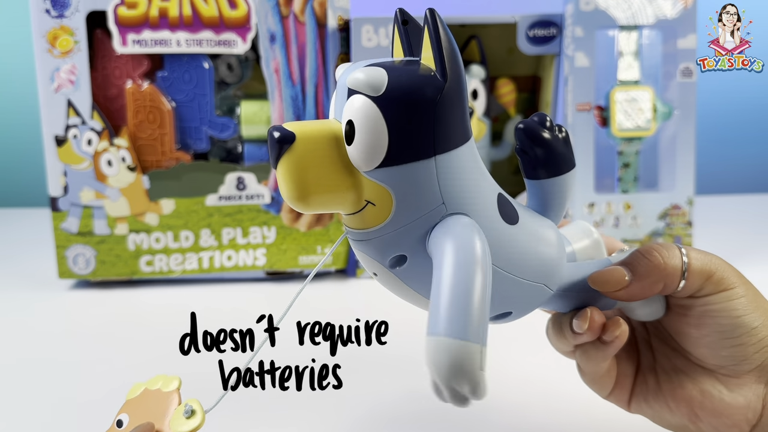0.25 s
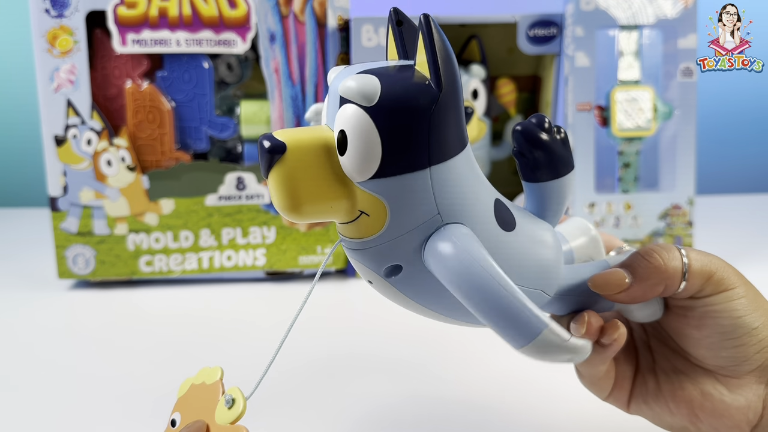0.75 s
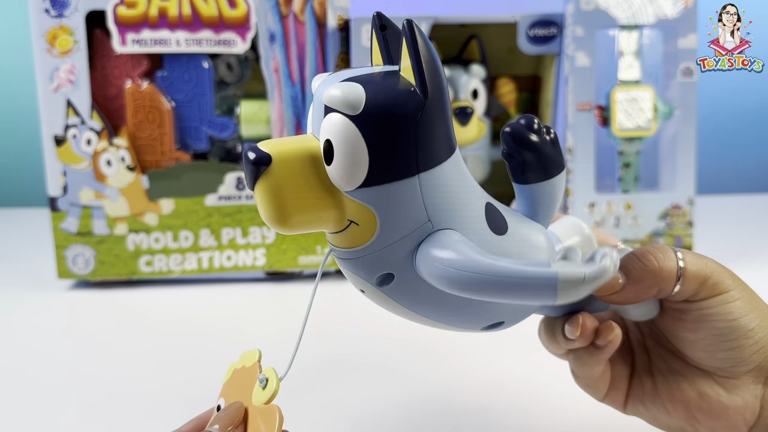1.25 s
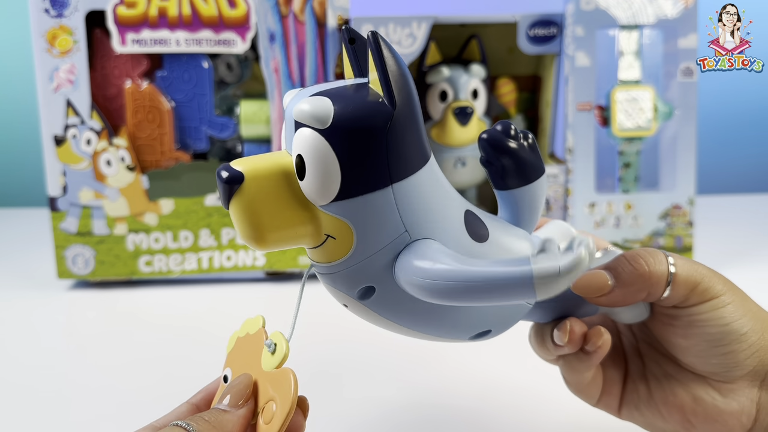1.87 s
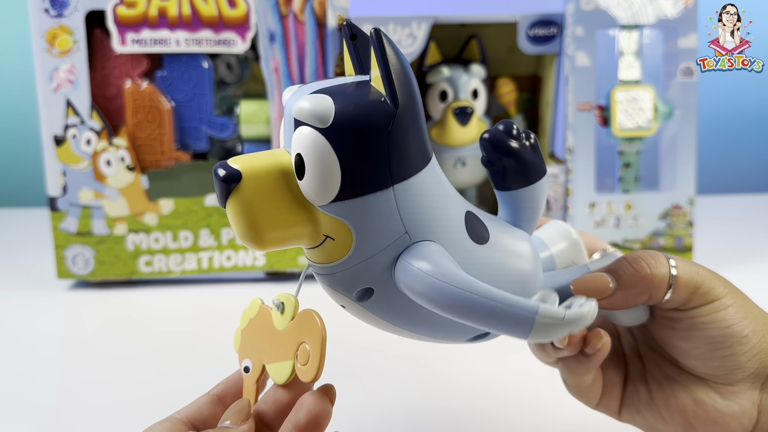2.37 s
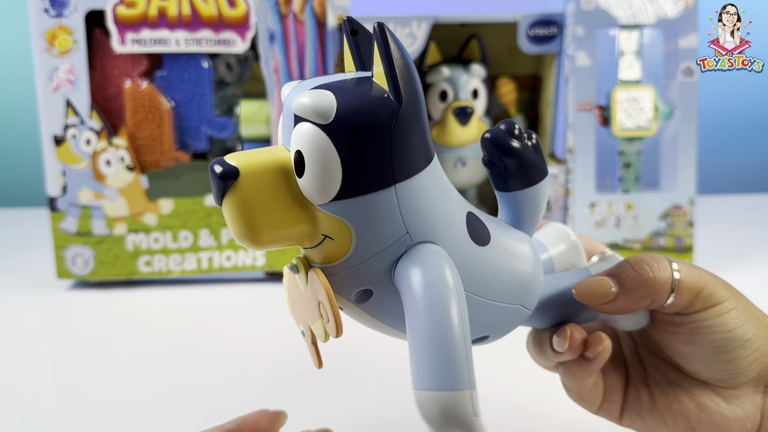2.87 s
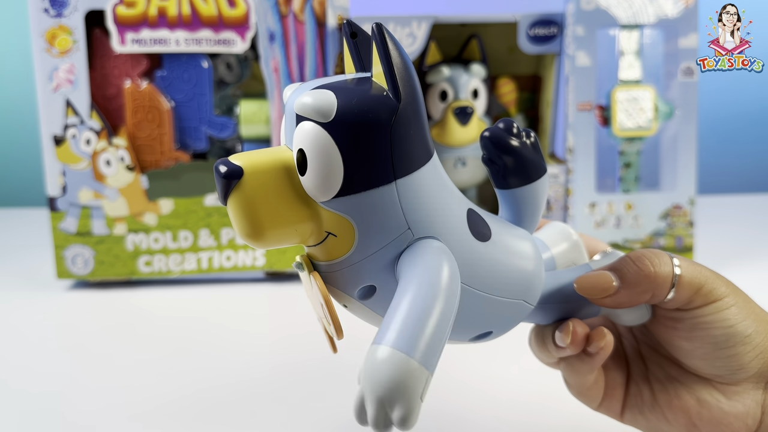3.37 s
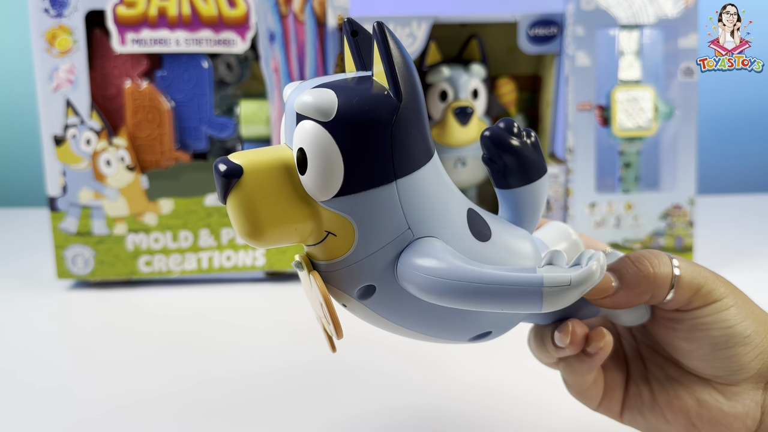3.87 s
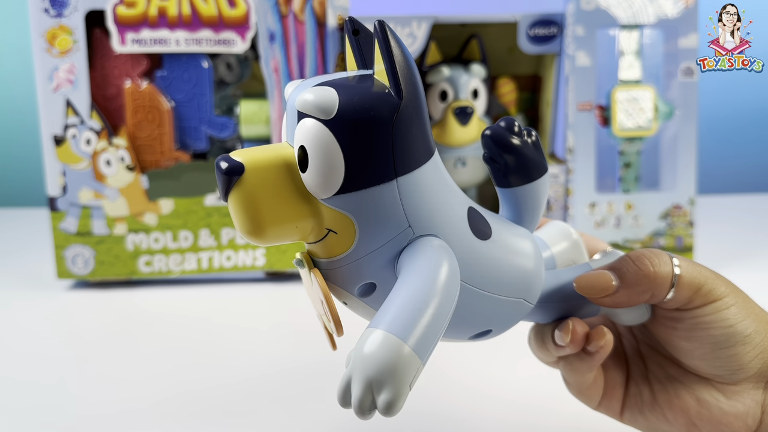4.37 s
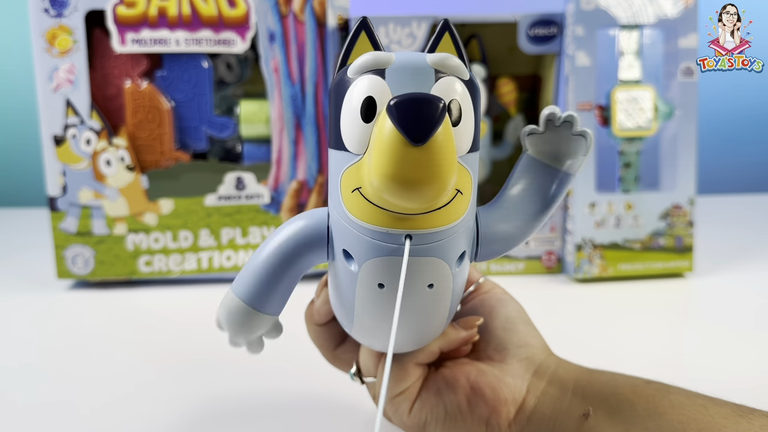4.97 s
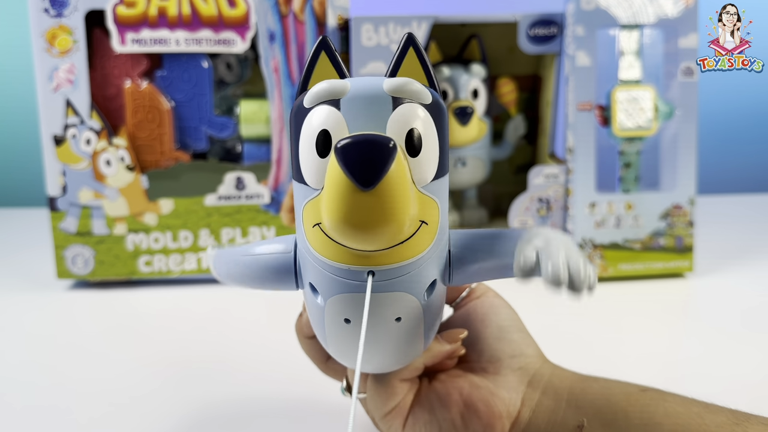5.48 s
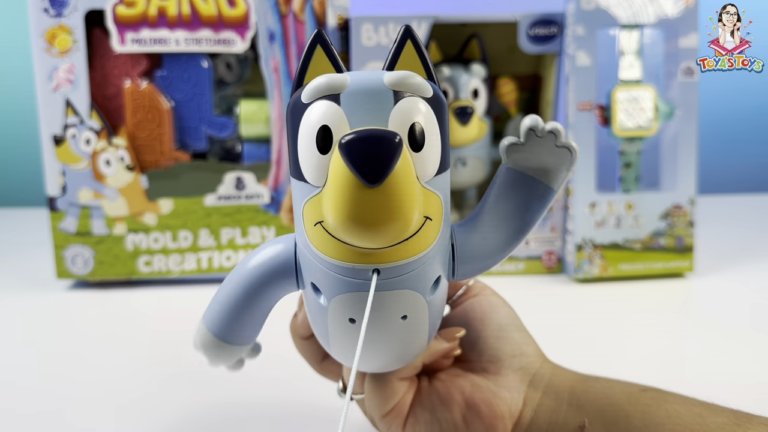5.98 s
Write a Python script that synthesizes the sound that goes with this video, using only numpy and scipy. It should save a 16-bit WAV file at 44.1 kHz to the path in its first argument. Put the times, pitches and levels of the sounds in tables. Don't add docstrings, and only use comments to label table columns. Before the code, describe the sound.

Steady, uneven plastic clacking and gear whir from a wind-up toy with swinging arms, heard close and dry with a short room echo. The knocking gradually slows, the whir drops away and a few sharp clicks mark the spring giving out. A second of soft room hush follows, with barely any touches. Then the mechanism spins up quickly into a denser, stronger rattle of about twelve hard knocks a second.

```python
import sys
import numpy as np
from scipy import signal
from scipy.fft import rfft, irfft, next_fast_len
from scipy.io import wavfile

SR = 44100
rng = np.random.default_rng(int(sys.argv[2]) if len(sys.argv) > 2 else 0)


def volts_from_db(level):
    exponent = np.asarray(level, float) / 20
    return 10 ** exponent


def int16_out(signal):
    q = np.round(np.clip(np.atleast_2d(signal).T, -1, 1) * 32767)
    wavfile.write(sys.argv[1], SR, q.astype(np.int16))


N = 274743

# (time of hard contact [s], its peak [dB], extra for the soft contact [dB])
TURNS_SIDEWAYS = [(0.021, -27.5, 0.1), (0.139, -26, 1), (0.254, -23.5, -1), (0.373, -23.5, -0.5),
                  (0.492, -22, 1.2), (0.611, -22, -0.5), (0.731, -24.5, 0.5), (0.852, -22.5, -1.5),
                  (0.974, -23.5, 0.1), (1.096, -27, 3.3), (1.214, -22.5, -2.5), (1.336, -26.5, 3.5),
                  (1.456, -24, 3), (1.578, -23.5, 2), (1.7, -22, 1.5), (1.824, -22.5, -0.5), (1.95, -24, 1),
                  (2.078, -23.5, 0.5), (2.206, -24, 2), (2.333, -22, 1.5), (2.463, -21.5, -3),
                  (2.593, -23, -0.7), (2.728, -26, -0.7), (2.862, -23.5, -3.2), (2.999, -25.5, -1.2),
                  (3.145, -23, -4.2)]
# (time of hard contact [s], peak [dB], extra for the soft contact
# [dB])
TURNS_FACING = [(4.922, -22.5, 0.1), (5.015, -21, 0.1), (5.099, -19, 0.1), (5.182, -20, 0.1),
                (5.263, -18.5, 0.1), (5.346, -19, 0.1), (5.43, -20, 0.1), (5.511, -19, 0.1),
                (5.596, -19, 0.1), (5.682, -19, 0.1), (5.767, -19, 0.1), (5.855, -20.5, 0.1),
                (5.941, -17.5, 0.1), (6.029, -20.5, 0.1), (6.116, -18, 0.1), (6.206, -18.5, 0.1)]
# (place [turns], knock [dB], hollow thud [dB], bright rattle [dB])
LOBES_SIDEWAYS = [
    (-.29, -34, -43.5, -38.5),
    (0, -26.5, -36.5, -30.5),
    (.345, -63, -46.5, -70),
]
# (place [turns], knock [dB], hollow thud [dB], bright rattle [dB])
LOBES_FACING = [
    (-.31, -29, -37, -33),
    (0, -24, -30.5, -30),
    (.35, -58, -64, -58),
]
# (knock [dB], thud [dB], rattle [dB])
SLOWING = [
    (-1.5, 2.6, -2),
    (-0.46, -1.3, -1.5),
    (-3.5, -1.4, 3.5),
]
# (time [s], knock [dB], thud [dB], rattle [dB])
CAM_STALLING = [
    (3.346, -28.5, -43.5, -46),
    (3.631, -32, -45, -63),
    (3.702, -55, -58, -73),
    (3.931, -81, -69, -84),
    (3.994, -61.5, -63.5, -79),
    (4.469, -63, -84.5, -69),
]
# (time [s], knock [dB], thud [dB], rattle [dB])
CAM_RELEASE = [
    (4.598, -72.5, -81, -60),
    (4.639, -54, -67, -68),
    (4.686, -67, -84, -60),
    (4.731, -81, -74, -56),
    (4.765, -36, -52, -43),
    (4.807, -27, -35.5, -44),
]
# (time [s], level [dB])
GEARS_SIDEWAYS = [
    (0.0, -47),
    (0.56, -48),
    (1.81, -48),
    (3.04, -46.5),
    (3.26, -53.5),
    (3.37, -54),
    (3.68, -62.5),
    (4.02, -76),
    (4.2, -75.5),
]
# (time [s], level [dB])
GEARS_FACING = [
    (4.56, -91),
    (4.684, -63),
    (4.87, -47),
    (4.95, -43.5),
    (5.29, -42.5),
    (6.23, -45),
]
# (frequency [Hz], width [Hz], left [dB], right [dB])
SHELL_SIDEWAYS = [(62.2, 30, -15.5, -10.5), (141.6, 45, -6, -5.5), (307.3, 145, -0.5, 3), (415, 90, 4, 8.5),
                  (529, 39, -3, 8.5), (582, 42.5, 5.5, 8), (991, 290, 5.5, -1), (1400, 610, -0.5, -0.5),
                  (1614, 130, 1.5, 6.5), (1727, 95, -3, 1), (2825, 197, -0.5, 3), (3107, 138, -7.5, -3),
                  (3770, 560, -9.5, -12), (4680, 240, -8.5, -9), (5060, 540, -11, -11.5),
                  (7100, 980, -17, -14), (8810, 630, -20, -9.5), (10700, 1200, -32.5, -45.5),
                  (13370, 1200, -22, -21.5), (15400, 760, -21.5, -43.5)]
# (frequency [Hz], width [Hz], left [dB], right [dB])
SHELL_FACING = [(57.5, 20, -2.5, -13), (138, 130, -14, -7), (359.5, 59, -6.5, 5.5), (437, 75, -4, 4),
                (633, 98, -4.5, 8), (689, 65, 11, 1.5), (800, 880, 2.5, -18), (1350, 590, 5, 4),
                (1656, 68, 8, 11.5), (1876, 80, 0, 0.5), (2265, 67, 1.5, 4.5), (2786, 333, 0.5, 4),
                (4070, 360, 1, -0.5), (4820, 390, 1, 1.5), (5660, 540, -1, -4), (7130, 660, -2.5, 1),
                (8480, 240, -14, 2), (9030, 250, -5, 3.5), (11700, 1500, -24, -32),
                (12400, 1300, -11.5, -13), (15000, 1000, -10, -14)]
# (frequency [Hz], time to fall 60 dB [s], level [dB])
ROOM = [
    (395, 0.38, -1),
    (1290, 0.22, -0.5),
    (3040, 0.29, -3.2),
    (8300, 0.19, -0.5),
]
# (frequency [Hz], level [dB per Hz])
AIR = [(15, -32), (25, -10), (53, 0.5), (100, -16), (143, 1), (209, -15.5), (243, -8), (269, -15),
       (393, -18.5), (721, -33), (1580, -32), (2300, -40.5), (10500, -46.5), (13600, -85.5), (22000, -120)]
# (frequency [Hz], level [dB])
WHINE = (14885, -87)
# (time [s], level [dB], sheen [dB])
TICKS = [
    (2.61, -25.5, -12.5),
    (3.261, -23.5, -7),
    (3.3896, -23, -4.5),
    (3.549, -21, -9.5),
    (3.7482, -23, -7),
    (4.048, -24.5, -7),
]
# (frequency [Hz], width [Hz], left [dB], right [dB])
PAWL = [(404, 55, -17.5, -10), (1550, 150, -9, -12.5), (2196, 50, -4, -5), (2960, 630, -11, -10.5),
        (4460, 510, -9, -13.5), (5150, 280, 0.5, -3), (5840, 270, 0, -3), (6830, 1200, -12, -10.5),
        (8970, 350, -18.5, -2), (12100, 1600, -23.5, -19.5), (12860, 370, 2.5, -3.5), (15400, 550, -5, 4)]
# (time of peak [s], level [dB], rise [dB per s], fall [dB per s])
PINION = [
    (3.2, -52.5, 32.5, 47.5),
    (4.76, -56, 190, 133),
]


def rms_one(x):
    return x / np.sqrt(np.mean(x ** 2) + 1e-20)


def in_time(rows):
    s, level_db, *rest = np.transpose(rows)
    t = np.arange(N) / SR
    level = np.interp(t, s, level_db, left=-140, right=-140)
    return [level] + [np.interp(t, s, column) for column in rest]


def resonance(x, hz, width_hz):
    r = np.exp(-np.pi * abs(width_hz) / SR)
    top = np.array([1, 0, -1]) * (1 - r * r) / 2
    return signal.lfilter(top, [1, -2 * r * np.cos(2 * np.pi * hz / SR), r * r], x + 1e-18)


def marks(times, heights):
    out = np.zeros(N)
    out[np.minimum((np.asarray(times) * SR).astype(int), N - 1)] = heights
    return out


def swell(tau_s):
    t = np.arange(SR // 60) / SR / abs(tau_s)
    return (t / 4) ** 4 * np.exp(4 - t)


def knocks(times, heights, tau_s, streams, loose, push=0):
    at, force = marks(times, heights), swell(tau_s)
    clatter = force * (push + rng.standard_normal((4, len(force))))
    same = signal.oaconvolve(at[None], clatter, axes=1)[:, :N]
    return same + loose * signal.oaconvolve(at, force)[:N] * streams


def grit(spread_db):
    impacts = rng.standard_normal((4, N))
    size_db = spread_db * np.minimum(rng.exponential(1, (4, N)), 5)
    return rms_one(impacts * volts_from_db(size_db))


def shell(modes, drives, alike_hz, in_step_hz=550):
    right_lag = 22
    out = np.zeros((2, N))
    for k, (hz, width_hz, left_db, right_db) in enumerate(modes):
        drive = drives[int(hz > 200) + int(hz > 1000) + int(hz > 3000)]
        own = 1 / np.sqrt(1 + (alike_hz / hz) ** 2)
        shake = np.sqrt(1 - own ** 2) * drive[k % 2] + own * drive[2:]
        left, right = (-1) ** k * volts_from_db([[left_db], [right_db]]) * resonance(shake, hz, width_hz)
        lag = right_lag * int(hz > in_step_hz)
        out[0] += left
        out[1, lag:] += right[:N - lag]
    return out


def cam_contacts(turns, lobes):
    lead_s = .0014
    scatter_db = 1.08
    s, peak_db, soft_db = np.transpose(turns)
    period = np.gradient(s)
    longer = (period - period.min()) / .01
    extra = [soft_db, peak_db - peak_db.mean(), 0 * s]
    rows = []
    for (place, *levels), slope, own in zip(lobes, SLOWING, extra):
        scatter = scatter_db * rng.standard_normal((len(s), 3))
        levels_db = levels + np.outer(longer, slope) + own[:, None] + scatter
        times = s - lead_s + place * period
        rows += [(at, *row) for at, row in zip(times, levels_db) if 0 < at < N / SR]
    return rows


def gearing(gears, turns, shine_db):
    s = np.array(turns)[:, 0]
    period = np.gradient(s)
    at, level_db = np.transpose(gears)
    dull = 2 * (np.interp(at, s, period) - period.min()) / .01
    dull = dull + 0.2 * (level_db.max() - level_db)
    return np.transpose([at, level_db, shine_db - np.minimum(dull, 21)])


def clockwork(cam, gears, modes, streams, knock_db, rattle_db, drag_db, whir_db, in_step_hz):
    s, knock, thud, bright = np.transpose(sorted(cam))
    weight = knock + thud + bright
    hard = (weight > np.roll(weight, 1)) & (weight > np.roll(weight, -1))
    hard = hard & (np.diff(s, prepend=0) < .0395)
    gear_db, shine_db = in_time(gears)
    flutter = rms_one(resonance(rng.standard_normal(N), 53, 90))
    slack = np.convolve(marks(s[hard] - 0.055, 1), np.hanning(SR // 35), "same")
    whir = volts_from_db(gear_db + whir_db + 1.62 * flutter - 3.7 * slack)
    after = volts_from_db(np.where(hard, rattle_db, drag_db) + knock_db)

    def rattle(level_db):
        return signal.lfilter([1], [1, -np.exp(-1 / (0.017 * SR))], marks(s + .004, after * volts_from_db(level_db)))

    bounce = rng.uniform(size=(len(s), 2))
    thud_db = thud + knock_db
    hollow = knocks(s + 0.00089, volts_from_db(thud_db - 8.5), 0.00017, streams, loose=0.78, push=3.89)
    second_s = s + 0.00379 + 0.00425 * bounce[:, 0]
    hollow += knocks(second_s, volts_from_db(thud_db - 10 - 9.9 * bounce[:, 1]), 0.00015, streams, loose=.3, push=2.9)
    late = np.round((0.0095 + 0.00596 * bounce[:, 1]) * SR)
    rebound = marks(s + 0.005035 + late / SR, hard * volts_from_db(thud_db + 1.0 - 7 * bounce[:, 0]))
    hollow += signal.lfilter(np.ones(12), [1], rebound)
    hollow = signal.sosfilt(signal.butter(2, 260, "high", fs=SR, output="sos"), hollow)
    drives = [volts_from_db(6) * whir * streams, hollow + (rattle(thud - 3) + volts_from_db(-8) * whir) * streams]
    registers = ((knock - 7, -4, 19, whir), (bright + 3, -8, 9, volts_from_db(shine_db) * whir))
    for level_db, soft_db, spike_db, grind in registers:
        heights = volts_from_db(level_db + knock_db)
        snap = knocks(s, heights * hard, .00095, streams, loose=0.54)
        snap = snap + marks(s + 0.0038, heights * hard * volts_from_db(spike_db))
        drag = knocks(s, heights * ~hard, 0.00089, streams, loose=0.8)
        drag = drag + marks(s + 0.002097, heights * ~hard * volts_from_db(spike_db - 4))
        drives.append(snap + volts_from_db(soft_db) * drag + (rattle(level_db) + grind) * streams)
    return shell(modes, drives, alike_hz=2020, in_step_hz=in_step_hz)


def room(x):
    t = np.arange(SR // 2) / SR
    tail = np.zeros((2, len(t)))
    for hz, t60, level_db in ROOM:
        band = signal.butter(1, [hz / 1.7, hz * 1.7], "band", fs=SR, output="sos")
        tail += signal.sosfilt(band, rng.standard_normal(tail.shape)) * volts_from_db(level_db - 60 * t / t60)
    tail *= np.minimum(t / 0.0026, 1) ** 2 / np.sqrt(np.sum(tail ** 2) / 2)
    return signal.fftconvolve(x, tail, axes=1)[:, :N]


def room_tone():
    white = rng.standard_normal((2, 3, N))
    edges = 25 * 2 ** np.arange(0, 9.4, .5)
    hush = 0
    hz, level_db = np.transpose(AIR)
    for k, (low, high) in enumerate(zip(edges, edges[1:])):
        band = signal.butter(2, [low, high], "band", fs=SR, output="sos")
        shared, *own = signal.sosfilt(band, white[k % 2])
        band_db = np.interp(np.log(low * high) / 2, np.log(hz), level_db)
        hush = hush + volts_from_db(band_db) * (shared + np.array(own))
    whine_hz, whine_db = WHINE
    whine = volts_from_db(whine_db) * np.sin(2 * np.pi * whine_hz * np.arange(N) / SR)
    return volts_from_db(-67.5) * rms_one(hush) + whine


def ratchet(streams):
    s, level_db, sheen_db = np.transpose(TICKS)
    fade = [1, -np.exp(-1 / (0.014 * SR))]
    buzz = signal.lfilter([1], fade, marks(s + 0.0029, volts_from_db(level_db - 19))) * streams
    snap = knocks(s, volts_from_db(level_db + 8.5), 0.0007, streams, loose=0.23) + buzz
    snap = snap + marks(s + 0.002, volts_from_db(level_db + 18.5))
    sheen = knocks(s, volts_from_db(level_db + sheen_db + 10.5), 0.00052, streams, loose=0.28) + volts_from_db(-2.0) * buzz
    return shell(PAWL[:9], [snap] * 4, alike_hz=2840) + shell(PAWL[9:], [sheen] * 4, alike_hz=20000)


def pinion(streams):
    t = np.arange(N) / SR
    level = sum(volts_from_db(db - np.maximum(rise * (s - t), fall * (t - s))) for s, db, rise, fall in PINION)
    return level * volts_from_db(10.0) * volts_from_db([[1.5], [-2.5]]) * resonance(streams[2:], 5400, 490)


def scene():
    streams = grit(spread_db=2.5)
    toy = clockwork(cam_contacts(TURNS_SIDEWAYS, LOBES_SIDEWAYS) + CAM_STALLING,
                    gearing(GEARS_SIDEWAYS, TURNS_SIDEWAYS, shine_db=9.5), SHELL_SIDEWAYS, streams,
                    knock_db=8, rattle_db=-25.0, drag_db=-7.0, whir_db=7.5, in_step_hz=550)
    toy += clockwork(CAM_RELEASE + cam_contacts(TURNS_FACING, LOBES_FACING),
                     gearing(GEARS_FACING, TURNS_FACING, shine_db=1.7), SHELL_FACING, streams,
                     knock_db=4, rattle_db=-40.0, drag_db=-12, whir_db=6.0, in_step_hz=770)
    toy += pinion(streams)
    pawl = ratchet(streams)
    return toy + pawl + room(volts_from_db(-8) * toy + volts_from_db(-7.0) * pawl) + room_tone()


def slice_hz(x, low_hz, high_hz):
    size = next_fast_len(N, True)
    f = np.arange(size // 2 + 1) * SR / size
    gain = np.clip(np.minimum(f - low_hz, high_hz - f) / 300 + .5, 0, 1)
    return irfft(rfft(x, size) * gain, size)[:N]


def low_pass(x):
    return signal.sosfilt(signal.butter(12, 16970, fs=SR, output="sos"), x)


def record(dry):
    mix = signal.sosfilt(signal.butter(2, 45, "high", fs=SR, output="sos"), dry)
    mix = signal.sosfilt(signal.cheby2(8, 50, 17300, fs=SR, output="sos"), mix)
    return low_pass(mix)


dry = scene()
out = record(dry)
int16_out(out)
```